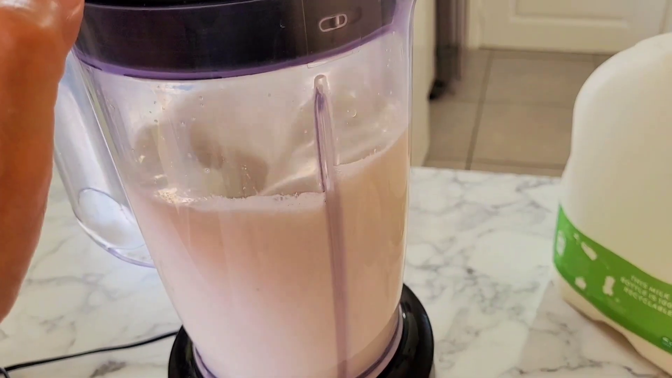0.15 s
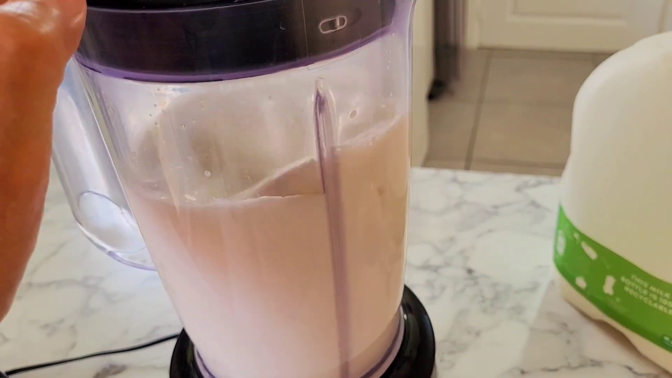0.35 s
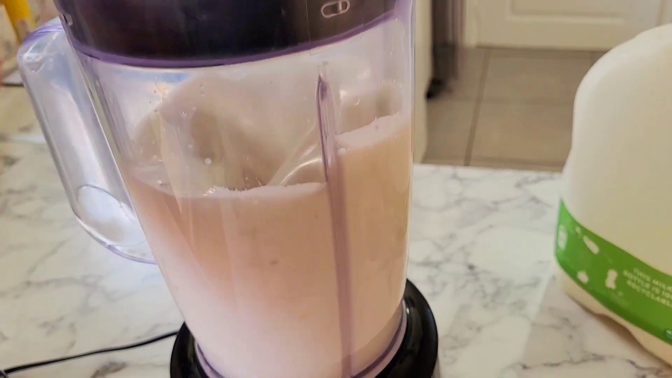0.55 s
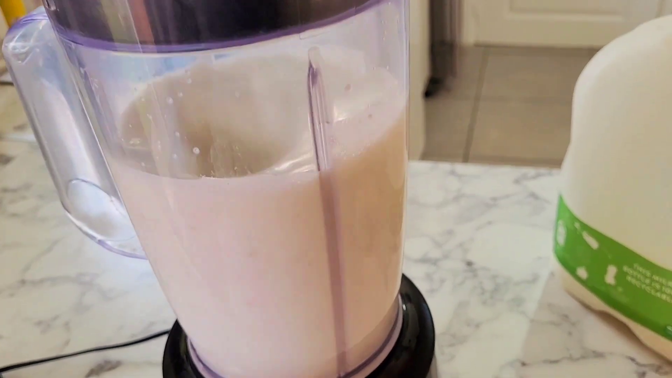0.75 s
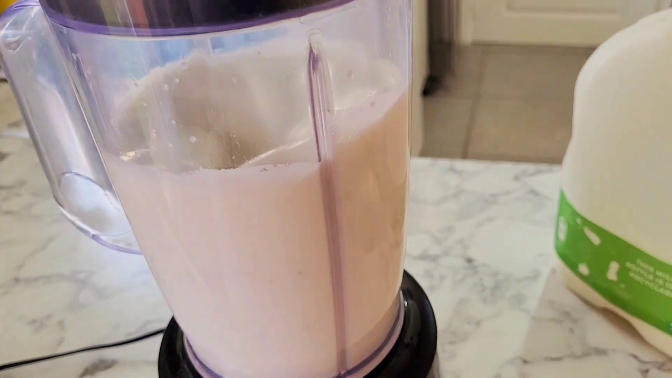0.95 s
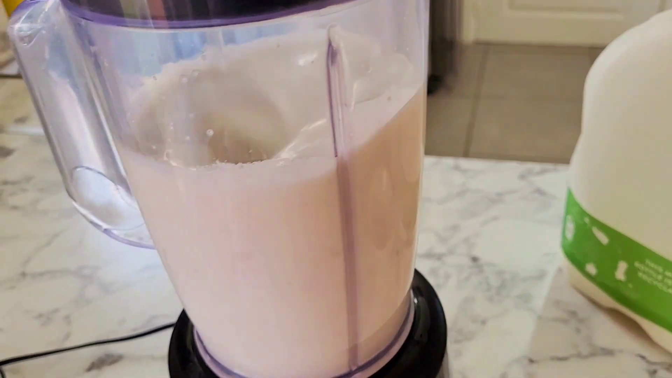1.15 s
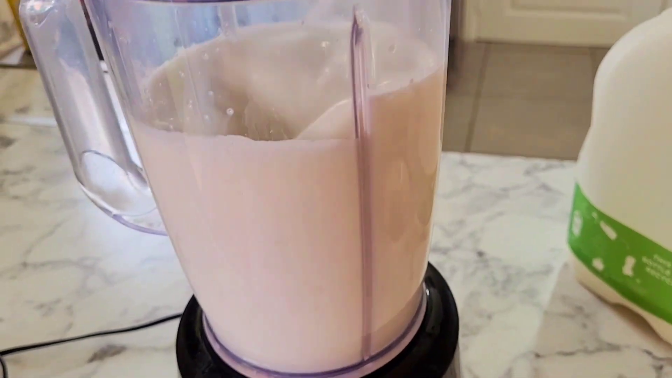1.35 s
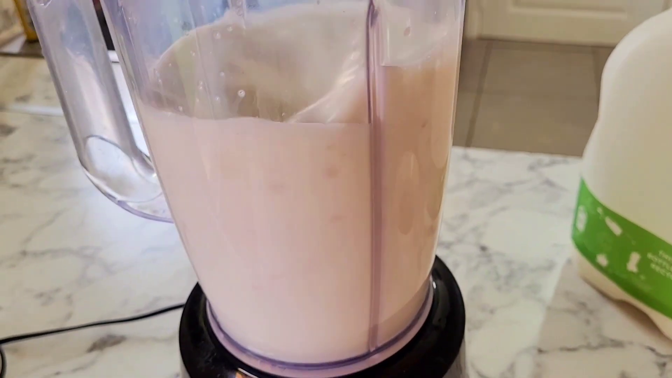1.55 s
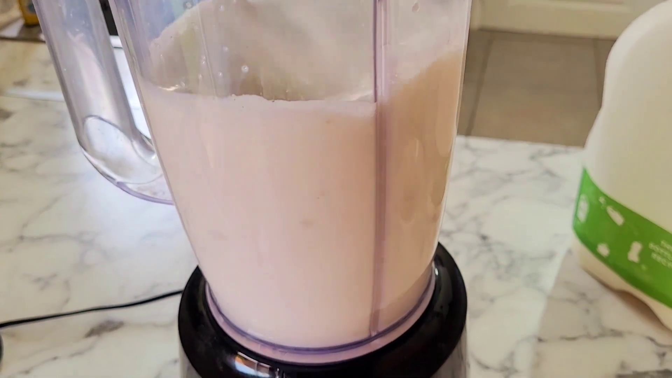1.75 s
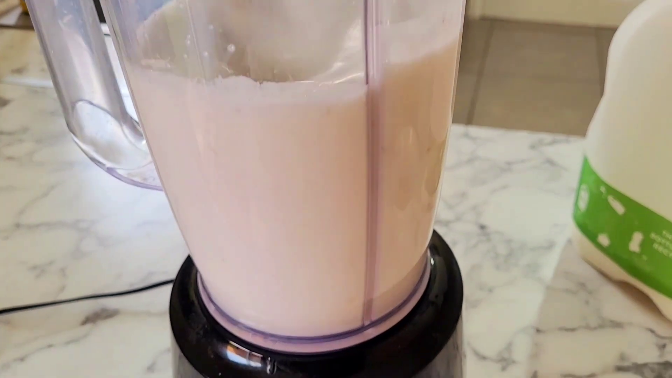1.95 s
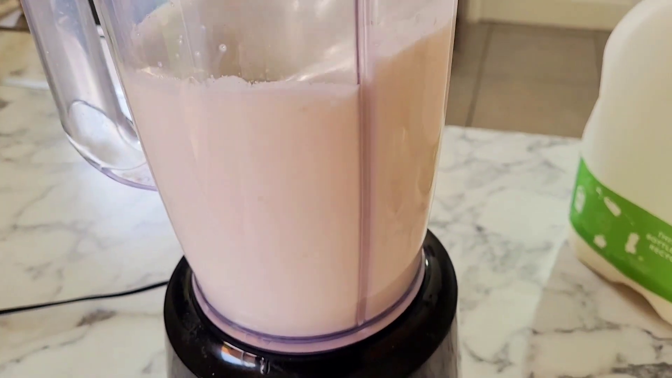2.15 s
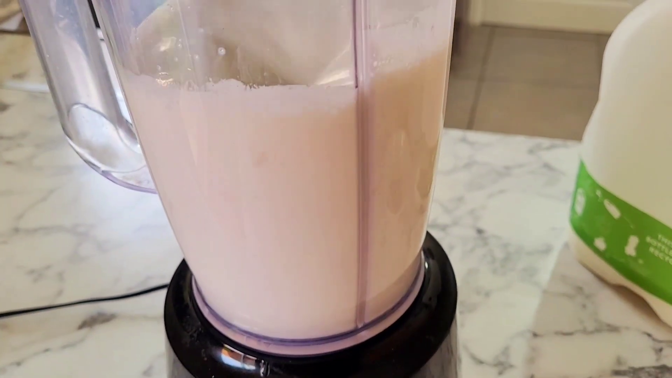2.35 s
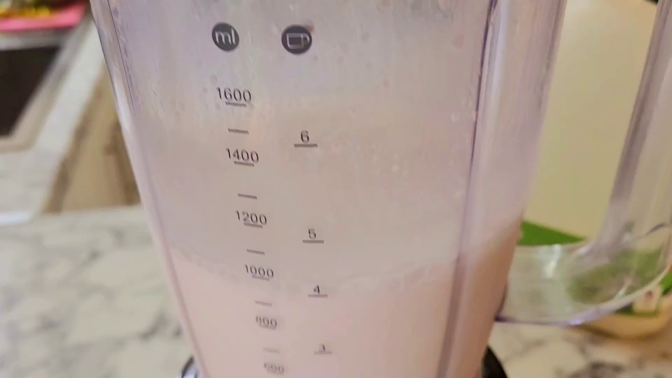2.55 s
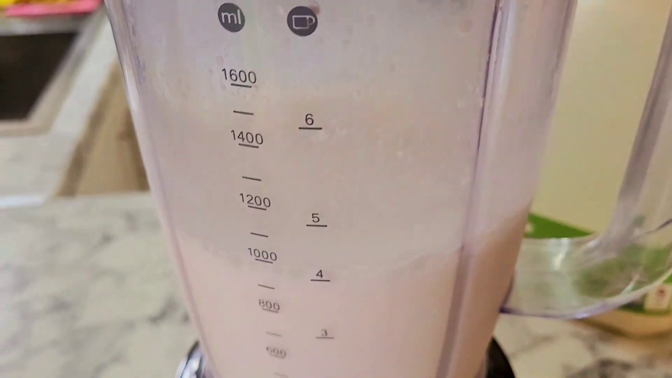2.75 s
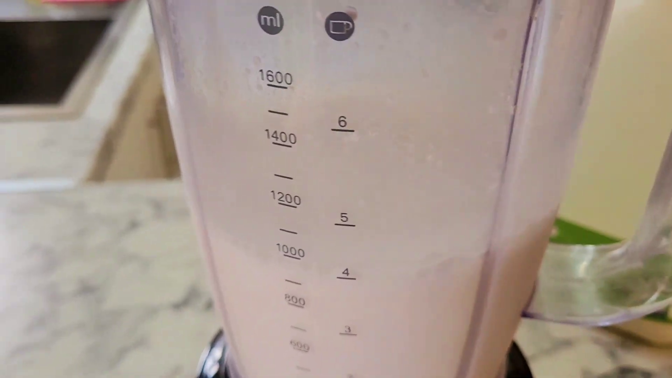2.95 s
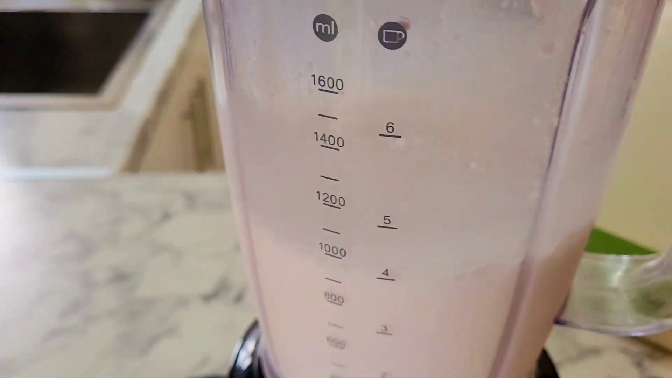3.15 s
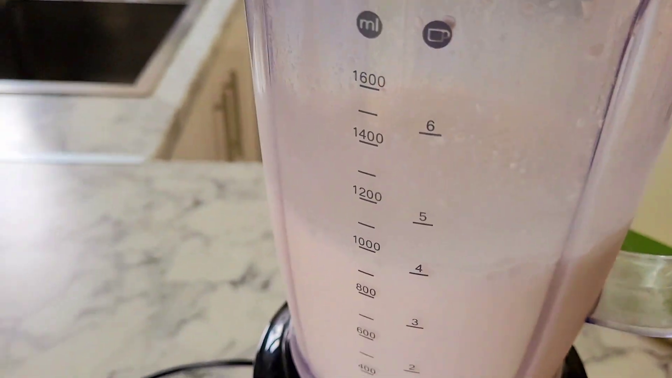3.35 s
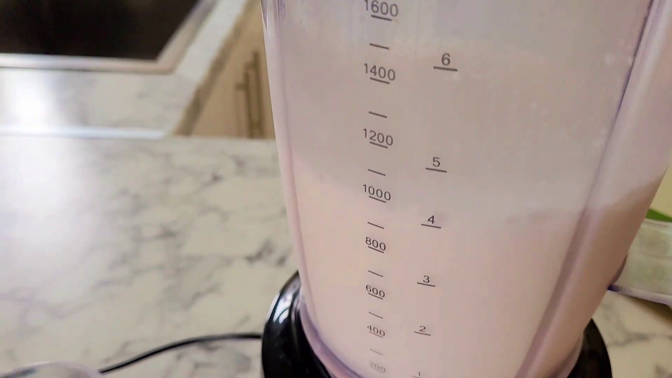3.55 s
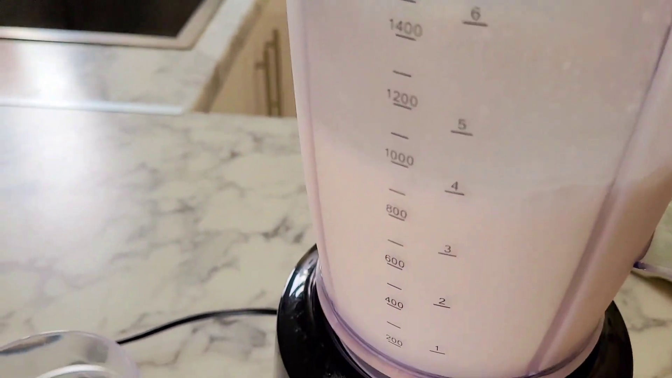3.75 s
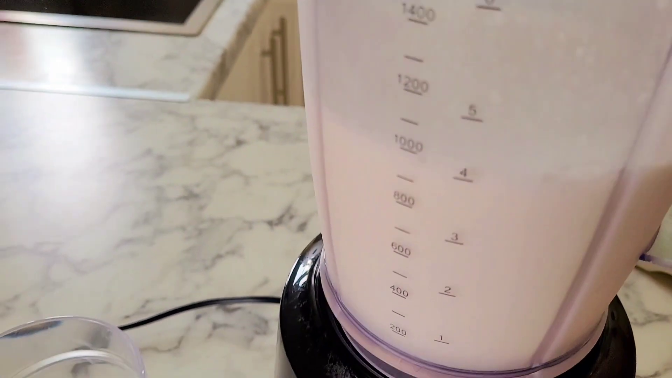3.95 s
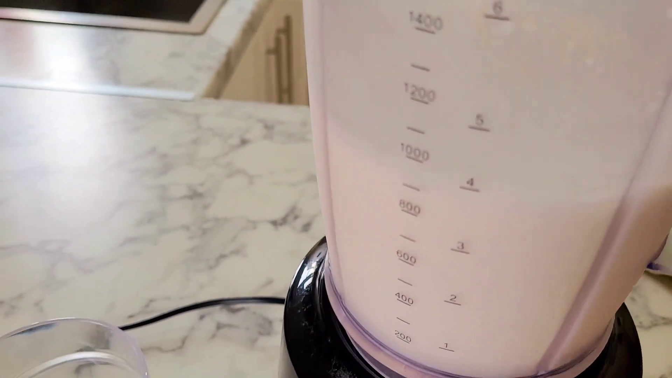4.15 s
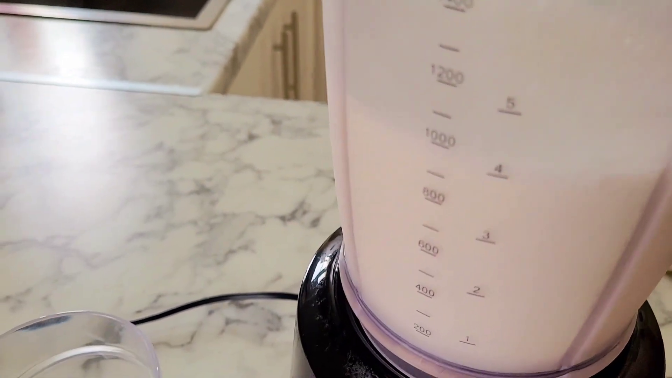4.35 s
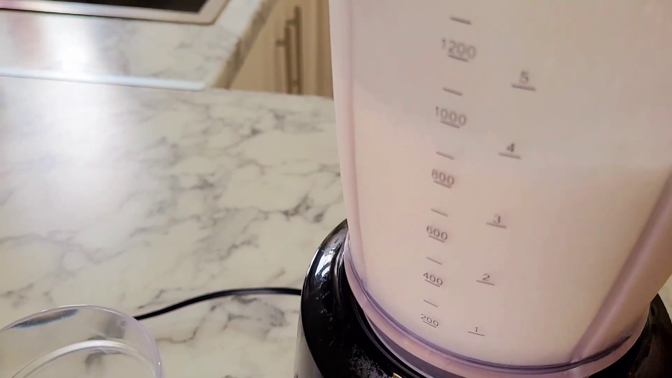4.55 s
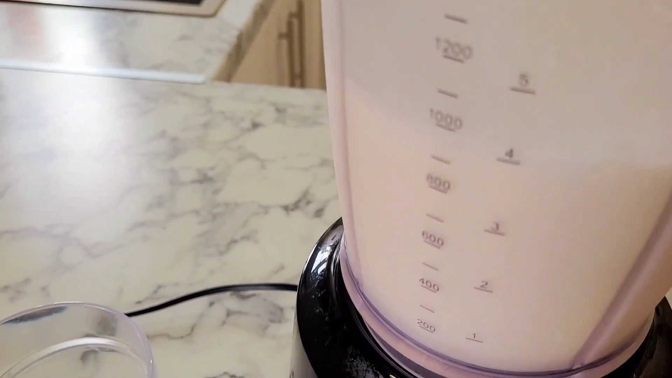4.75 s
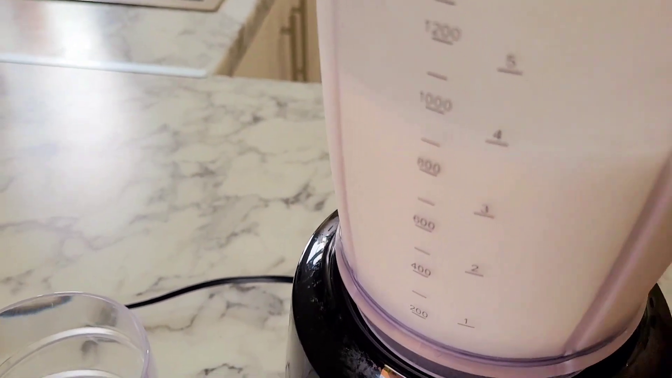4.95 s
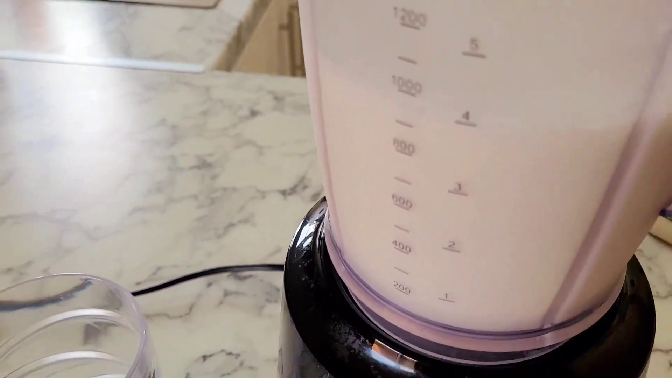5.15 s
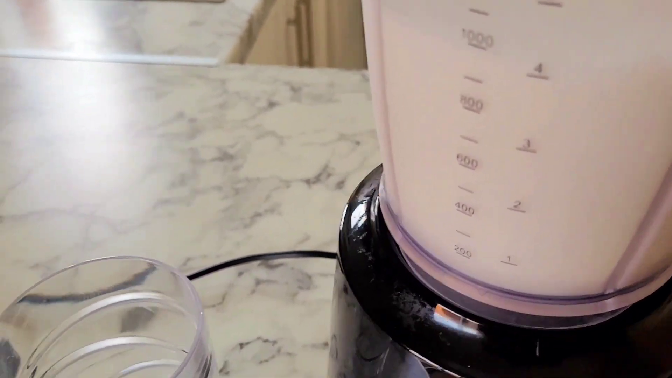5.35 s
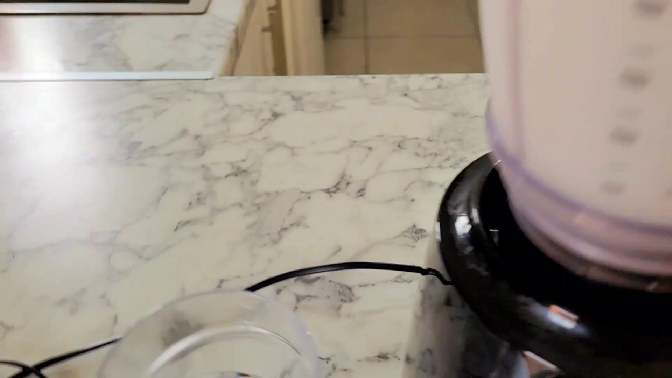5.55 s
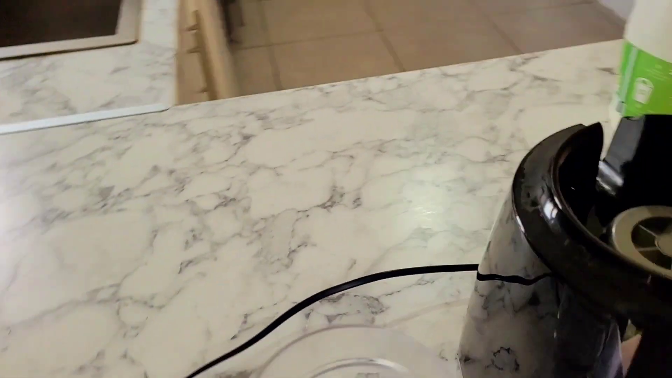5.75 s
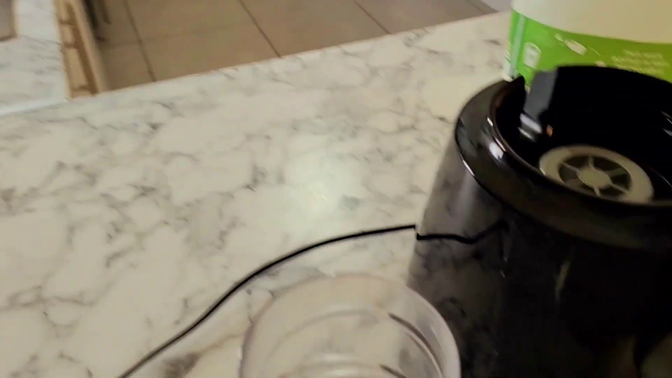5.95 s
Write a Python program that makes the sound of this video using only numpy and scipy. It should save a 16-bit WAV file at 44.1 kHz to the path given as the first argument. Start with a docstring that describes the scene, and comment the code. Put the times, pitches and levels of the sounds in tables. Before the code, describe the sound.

From 0 to about 2.6 seconds a countertop blender runs loudly and close: a steady motor buzz near 220 hertz with wavering overtones and faint whine, broad splashing roar of thick drink, ringing jug resonances and deep counter rumble swelling near 0.7 and 2.3 seconds. Brittle ice cracks flick through it, more often near the end. At 2.57 seconds everything stops at once. A quiet low kitchen background and very faint fridge hum remain. Around 3.1 to 3.4 seconds, hollow plastic knocks tap the base with tiny squeaks; a stronger clattering cluster comes at 3.8. At about 4.7 a hard object bangs farther away, a rapid triple blow with a long bright room echo. From 5.2 to 5.5 softer jug bumps, a low rubbing groan and brushing accompany the lifting, with gentle strokes near 5.7 and a brighter brush and faint tap around 6.1.

```python
"""A countertop blender churns a thick drink in a hard kitchen: motor tones, splashing noise, ringing jug
resonances, a rumbling counter and cracking ice, all cut off at once. In the quiet after it the plastic jug is
knocked on its base, among faint squeaks, breathy whistles, groans and a short ring; something hard bangs
further off and rings through the room as struck modes and a noise tail; the jug is lifted away with soft
strokes of brushing noise. Under the quiet lies a low wavering background, and faint fridge tones hum
throughout."""
import sys
import numpy as np
from scipy import signal
from scipy.io import wavfile

SR = 44100
rng = np.random.default_rng(int(sys.argv[2]) if len(sys.argv) > 2 else 0)


def wrap_up_sound(samples):
    """Save the sound to the file named by the first command line argument, as 16-bit audio."""
    columns = np.atleast_2d(samples).T
    # keep every value between -1 and 1, then stretch to whole-number steps
    tamed = np.clip(columns, -1, 1)
    steps = np.round(tamed * 32767).astype(np.int16)
    wavfile.write(sys.argv[1], SR, steps)


N = 268569
CUT_S = 2.5735   # the blender is silent from here on
RUN_SIZE = round(CUT_S * SR)
RUN_T = np.arange(RUN_SIZE) / SR   # seconds while the blender runs


def from_db(db):
    """Decibels to gain."""
    return 10 ** (np.asarray(db) / 20)


def rms_one(x):
    """Scales to unit rms."""
    return x / np.sqrt(np.mean(x ** 2) + 1e-20)


def high_pass(x, hz):
    """Gentle second-order bass cut."""
    return signal.sosfilt(signal.butter(2, hz, "high", fs=SR, output="sos"), x)


def in_time(rows):
    """Columns of a curve table at every sample."""
    s, *columns = np.transpose(rows)
    return [np.interp(np.arange(N) / SR, s, c) for c in columns]


def at_hz(points, hz):
    """Reads a spectrum on a log-frequency axis."""
    known_hz, values = np.transpose(points)
    return np.interp(np.log(hz), np.log(known_hz), values)


def drift(rate, size=N):
    """Smooth random wander of spread 1; a higher rate wanders faster."""
    r = np.exp(-80 * np.pi * rate / SR)   # computed at every 40th sample
    noise = rng.standard_normal(size // 40 + 2002)
    slow = signal.lfilter([1], [1, -2 * r, r * r], noise)[2000:]   # skip the filter's start
    return np.interp(np.arange(size) / 40, np.arange(len(slow)), rms_one(slow))


RISE_SHARE = 0.91   # a swell rises in this share of the time it takes to fall


def swells(rows, t):
    """Sum in dB of lifts that rise to their peak a little faster than they fall back."""
    return sum(db * np.exp(-np.abs(t - s) / np.where(t < s, RISE_SHARE * length, length))
               for s, db, length in rows)


def ring(clicks, hz, t60):
    """Two-pole resonance: a unit click sets a sine of height 1 ringing, down 60 dB after t60 seconds."""
    r, w = from_db(-60 / (t60 * SR)), 2 * np.pi * hz / SR
    return signal.lfilter([0, np.sin(w)], [1, -2 * r * np.cos(w), r * r], clicks + 1e-18)


def width_t60(width):
    """Decay time in seconds of a resonance of this width in Hz."""
    return np.log(1000) / np.pi / width


# How alike left and right are. Each row: frequency in Hz, likeness from -1 to 1.
LIKENESS = [(60, 0.54), (130, 0.66), (290, 0.98), (560, 0.38), (900, 0.27), (1400, -0.24), (3100, 0.12),
            (7000, -0.052), (15000, 0.78)]
EDGES = 28 * 2 ** np.arange(0, 9.4, 1 / 3)   # third-octave band edges in Hz


def stereo_noise(gain, size):
    """Third-octave bands of noise, each as alike left and right as LIKENESS asks; gain(hz) sets its level."""
    out, white = 0, rng.standard_normal((2, 2, size))
    for k, (low, high) in enumerate(zip(EDGES, EDGES[1:])):
        band_filter = signal.butter(3, [low, high], "band", fs=SR, output="sos")
        mid, side = signal.sosfilt(band_filter, white[k % 2])   # neighbouring bands use separate noise
        hz = np.sqrt(low * high)
        alike = np.clip(at_hz(LIKENESS, hz), -1, 1)
        out = out + gain(hz) * (np.sqrt(1 + alike) * mid + np.sqrt(1 - alike) * side * [[1], [-1]])
    return out


def burst(t60, size=2000):
    """A short crack of noise dying 60 dB in t60 seconds."""
    return rng.standard_normal(size) * from_db(-60 * np.arange(size) / SR / t60) / 2


def add(out, sound, s):
    """Mixes a sound in at a time in seconds."""
    i = round(s * SR)
    out[..., i:i + sound.shape[-1]] += sound[..., :N - i]


# How long the room rings, before each use scales it. Each row: frequency in Hz, t60 in seconds.
ROOM_T60 = [(60, 0.7), (160, 0.27), (420, 0.44), (1100, 0.53), (2910, 0.49), (7680, 0.39)]


def echoes(colour, t60_scale, size):
    """Room answer to a click: noise that builds over the first reflections and dies band by band."""
    t = np.arange(size) / SR
    tail = stereo_noise(lambda hz: from_db(at_hz(colour, hz) - 60 * t / (t60_scale * at_hz(ROOM_T60, hz))),
                        size)
    tail = high_pass(tail * (1 - np.exp(-t / .006)), 130)
    return tail / np.sqrt(np.mean(np.sum(tail ** 2, axis=1)))   # unit energy per channel on average


# Motor shaft, before a small jitter. Each row: time in seconds, speed in turns per second.
SPEED = [(0.0, 218.2), (0.23, 217.6), (0.4, 220.0), (0.79, 221.5), (1.02, 227.2), (1.27, 220.8),
         (1.47, 219.6), (1.78, 226.6), (2.15, 220.8), (2.56, 222.2)]


def blender():
    """The shaft turn drives motor tones and throbbing churn; rumble and ice join, and all end abruptly
    together."""
    speed = in_time(SPEED)[0][:RUN_SIZE]
    turn = 2 * np.pi * np.cumsum(speed * (1 + 0.004 * drift(25, RUN_SIZE))) / SR   # shaft angle, radians
    out = ice_cracks()
    out[:, :RUN_SIZE] += churn(turn) + motor(speed, turn) + counter_rumble()
    out[1] = np.roll(out[1], 4)   # the right port is a little further away
    return out * np.clip((RUN_SIZE - np.arange(N)) / (0.00084 * SR), 0, 1)   # the sound ends within a ms


# Motor tones, each loudest at the speed where the housing answers it. Each row: multiple of the shaft
# speed, level in dB, best speed in turns per second, loss in dB per turn per second off it, waver in dB.
MOTOR_TONES = [(1.0, -28.5, 226.2, .5, 1.5), (2.0, -29, 220.5, 1.5, 3), (4.0, -29.5, 225.5, 1.3, 2.8)]
# Brief swells of single motor tones. Each row: multiple, peak in seconds, lift in dB, length in seconds.
TONE_SWELLS = [(4.0, 0.26, 11, 0.066), (2.0, 0.27, 8, .05), (1.0, 0.91, 1.5, .06), (1.0, 1.14, 2, .1),
               (2.0, 1.19, 3.5, 0.11), (2.0, 2.6, 4, .08), (4.0, 2.28, 5.5, .1), (1.0, 2.44, 7, .07),
               (4.0, 2.45, 6, .05)]
# Faint higher motor tones, before their waver. Each row: multiple of the shaft speed, level in dB.
WHINE = [(6, -50), (7, -45.5), (8, -51.5), (12, -40), (13, -35.5), (17, -54.5)]
TONE_WAVER_RATE, WHINE_WAVER_RATE, WHINE_WAVER_DB = 9, 6.5, 2.6


def motor(speed, turn):
    """Sines locked to multiples of the shaft turn; the housing favours each strong one near its best speed."""
    out = 0
    side_turn = turn + 1.08 + np.array([[.1], [-.1]])   # left and right slightly out of phase
    for k, db, best, loss_db, waver_db in MOTOR_TONES:
        own_swells = [row[1:] for row in TONE_SWELLS if round(row[0]) == round(k)]
        level_db = db - loss_db * abs(speed - best) + swells(own_swells, RUN_T)
        level_db = level_db + waver_db * drift(TONE_WAVER_RATE, RUN_SIZE)
        out = out + np.sqrt(2) * from_db(level_db) * np.sin(round(k) * side_turn)
    for k, db in WHINE:
        level = from_db(db + WHINE_WAVER_DB * drift(WHINE_WAVER_RATE, RUN_SIZE))
        out = out + level * np.sin(round(k) * turn + rng.uniform(0, 2 * np.pi, (2, 1)))
    return out


# Churn and cooling air. Each row: frequency in Hz, relative density in dB per Hz.
ROAR = [(30, -39), (90, -33.5), (170, -39.5), (230, -4.5), (330, -3), (420, -14), (600, -11.5),
        (900, -10.5), (2000, -10.5), (3300, -9.5), (3900, -13.5), (5000, -16), (7200, -28), (8800, -34),
        (11500, -27.5), (16000, -34.5)]
# Stereo lean of the churn. Each row: frequency in Hz, left minus right in dB.
LEAN = [(60, -5), (110, -5.5), (200, 8), (380, -2.5), (700, -3), (1290, 0.0), (2380, 2), (4400, 1),
        (8120, -3.5), (15000, 8.5)]
# Drink folding back onto the blade. Each row: peak in seconds, lift in dB, length in seconds.
SURGES = [(0.01, 4, 0.083), (0.355, 2.5, 0.016), (0.468, 5.5, 0.037), (0.96, 0.5, .04), (1.09, 6, 0.017),
          (1.58, 1.5, 0.02), (1.8, 4, 0.05), (2.25, 3.5, 0.018)]
# Jug and housing resonances excited by the churn, before lift and waver.
# Each row: frequency in Hz, width in Hz, level in dB.
BODY = [(142, 57, -44), (291, 10, -38.5), (310, 46, -34.5), (351, 36, -36), (508.7, 19, -38.5),
        (950, 69, -32.5), (1206.7, 16, -34), (1356, 23, -35.5), (1550, 21, -39.5), (1680, 38, -35),
        (1776, 16, -41), (1877, 16, -38), (2520, 97, -38.5), (2585, 28, -35.5), (2914, 32, -40),
        (3206, 83, -33.5), (3388, 61, -38), (7530, 460, -40.5)]
SPLASH_DB, SPLASH_GROWS_DB_PER_S = -19.5, 0.68   # noise level, before the throb and the body resonances
SLOSH_WAVER_DB, SLOSH_RATE = 1.5, 12.3
RASP_DB, RASP_RATE = 1.05, 260   # quick uneven pulses of grit on the blade


def churn(turn):
    """Banded noise of drink and air, throbbing once a turn, with noise-driven resonances of jug and housing."""
    splash_db = swells(SURGES, RUN_T) + SPLASH_GROWS_DB_PER_S * (RUN_T - CUT_S / 2)
    slosh_db = SLOSH_WAVER_DB * drift(SLOSH_RATE, RUN_SIZE)
    rasp_db = RASP_DB * drift(RASP_RATE, RUN_SIZE)
    lumps_db = .6 * drift(33, RUN_SIZE)   # lumps passing the blade lift all bands together

    def band(hz):
        """Slosh takes over from splash below about 500 Hz."""
        low = 1 / (1 + (hz / 500) ** 4)
        lean_db = at_hz(LEAN, hz) / 2 * np.array([[1], [-1]])
        motion_db = low * slosh_db + (1 - low) * (splash_db / (1 + hz / 7000) + rasp_db)
        own_db = 0.99 * drift(21, RUN_SIZE)   # each band also wavers alone
        return from_db(at_hz(ROAR, hz) + motion_db + lean_db + lumps_db + own_db)

    noise = high_pass(stereo_noise(band, RUN_SIZE), 150)
    noise = noise / np.sqrt(np.mean((noise / from_db(splash_db)) ** 2))   # level with the splash lifts undone
    out = from_db(SPLASH_DB) * noise * (1 + 0.14 * np.sin(turn))
    for hz, width, db in BODY:
        shared, own = rng.standard_normal(RUN_SIZE), rng.standard_normal((2, RUN_SIZE))
        alike = np.clip(at_hz(LIKENESS, hz), 0, 1)
        rung = ring(np.sqrt(alike) * shared + np.sqrt(1 - alike) * own, hz, width_t60(width))
        level_db = db + (hz > 500) * splash_db + 2.0 * drift(5, RUN_SIZE)
        out = out + from_db(level_db) * rms_one(rung)
    return high_pass(out, 120)


# The counter shakes harder. Each row: peak in seconds, lift in dB, length in seconds.
SHUDDERS = [(0.72, 6, 0.287), (2.29, 11, 0.32)]
RUMBLE_DB, RUMBLE_WAVER_DB = -57, 6   # level between shudders, before the waver


def counter_rumble():
    """The shaking counter: noise driving a 49 Hz resonance, wavering and swelling in shudders."""
    push = rng.standard_normal(RUN_SIZE) + .3 * rng.standard_normal((2, RUN_SIZE))
    level_db = RUMBLE_DB + swells(SHUDDERS, RUN_T) + RUMBLE_WAVER_DB * drift(4, RUN_SIZE)
    return from_db(level_db) * rms_one(ring(push, 49, .15))


# Ice bits under the blade. Each row: time in seconds, level in dB of a burst before its bass cut.
CRACKS = [(0.0244, -18), (0.249, -11.5), (0.4694, -28), (0.6486, -18), (1.0829, -16.5), (1.2774, -15.5),
          (1.3289, -19), (1.6357, -18), (1.7906, -30), (1.9234, -14), (2, -16), (2.111, -15), (2.1724, -15),
          (2.2827, -12.5)]


def ice_cracks():
    """Brittle ice breaking: short bursts of treble noise that die at a different pace on each side."""
    out = np.zeros((2, N))
    for s, db in CRACKS:
        add(out, from_db(db) * high_pass([burst(0.016), burst(0.029)], 2500), s)
    return out


# Jug knocks. Each row: start in seconds, tick level in dB, tick colour in Hz, snap level in dB,
# thump peak in dB, thump colour in Hz, left minus right in dB (levels before this pan).
KNOCKS = [(3.104, -50, 1700, -49, -55, 357, 0.5), (3.116, -32, 1740, -48, -31, 240, 3),
          (3.129, -43, 1890, -52, -34, 352, 1.5), (3.3, -39.5, 1330, -54, -32, 190, 4),
          (3.312, -35.5, 1117, -44, -26, 233, 3), (3.36, -38.5, 1070, -65, -44, 234, -2),
          (3.548, -56, 749, -66, -46, 231, -2.5), (3.641, -51, 1100, -46.5, -64, 320, 2.5),
          (3.777, -45, 3240, -37, -37, 250, 2), (3.793, -42, 1850, -39, -37, 215, 5),
          (3.806, -36, 1090, -27, -24.5, 283, 4), (3.836, -30, 1920, -27, -26.5, 263, -2),
          (3.883, -56, 1120, -39, -36.5, 272, 0.1), (4.308, -61, 929, -59, -47.5, 310, -1),
          (5.22, -38.5, 1600, -55, -62, 194, 0.5), (5.331, -49, 910, -55, -31.5, 283, -4),
          (5.37, -51, 1210, -58, -42, 291, -6), (5.39, -53, 1500, -55, -40, 276, -4),
          (5.441, -44, 2930, -59, -39, 218, 0), (5.464, -61, 895, -52, -49, 226, 0.1),
          (6.066, -57, 1030, -50, -38, 324, -4)]
# Jug low modes. Each row: frequency in Hz, relative level in dB, t60 in seconds.
JUG = [(136, 0, 0.134), (162, 0, 0.065), (215, -0.5, 0.051), (238, -2, 0.066), (283, 1, 0.047),
       (356, -8.5, 0.07), (478, -4, 0.048)]
# Jug wall modes. Each row: frequency in Hz, relative level in dB, t60 in seconds.
WALL = [(1065, -3.5, 0.05), (1690, -4, 0.092), (1970, -1, 0.085), (3140, -14, 0.086), (3700, -17, .1),
        (4870, -8, .05)]
AIRY_DB, WALL_DB = -18, -15   # hiss relative to the snap; wall share of the tick
THUMP_LAG_S = .001   # the low push builds just after the tick
KNOCK_ROOM_DB = 1   # send to the room, before the share of each part


def knocks():
    """Each knock is a snap, a tick that rings the jug wall near its colour and a soft push into the low modes."""
    size = 8000
    dry, send = np.zeros((2, N)), np.zeros(N)
    sharp = signal.butter(2, [2500, 7000], "band", fs=SR, output="sos")
    push = np.zeros(size)
    push[:120] = np.diff(np.hanning(121))   # press and release
    for s, tick_db, tick_hz, snap_db, thump_db, thump_hz, pan_db in KNOCKS:
        hiss = high_pass([burst(0.2, size) for side in "LR"], 7000)
        snap = from_db(snap_db) * (signal.sosfilt(sharp, burst(0.032, size)) + from_db(AIRY_DB) * hiss)
        touch = burst(0.0064, size)
        tick = ring(touch, tick_hz, 4.4 / tick_hz)
        # modes near the colour of the blow ring most: loss in dB per octave away
        wall = sum(from_db(db - 25.0 * abs(np.log2(hz / tick_hz))) * ring(touch, hz, t60)
                   for hz, db, t60 in WALL)
        thump = sum(from_db(db - 14.0 * abs(np.log2(hz / thump_hz))) * ring(push, hz, t60)
                    for hz, db, t60 in JUG)
        bright = from_db(tick_db) * (tick + from_db(WALL_DB) * wall) / np.abs(tick).max()
        low = np.roll(from_db(thump_db) * thump / np.abs(thump).max(), round(THUMP_LAG_S * SR))
        add(dry, (snap + bright + low) * from_db([[pan_db / 2], [-pan_db / 2]]), s)
        add(send, from_db(KNOCK_ROOM_DB) * (.5 * snap[0] + 0.61 * bright + 0.96 * low), s)
    room_colour = [(60, -0.5), (1500, 2.5), (5000, 7.0), (16000, -2.0)]   # Hz, relative dB per Hz
    room = echoes(room_colour, 0.66, size=22050)
    return dry + signal.fftconvolve(send[None], room, axes=1)[:, :N]


# A far hard object struck. Each row: start in seconds, level in dB, lift of the low modes in dB,
# lift of the snap in dB, echo level in dB.
BANGS = [(4.6635, -12, -27, -0.5, 14.5), (4.6795, -16.5, 5.5, 6.5, 8), (4.688, -28, 8, -5.5, -2)]
# Modes of the struck object. Each row: frequency in Hz, relative level in dB, t60 in seconds.
BANG_MODES = [(232, -8.5, 0.13), (470.1, -4.5, 0.14), (710, -7, 0.028), (948, 0.5, 0.027),
              (1242, -8, 0.037), (1600, -19, 0.1), (2096, -12.5, .03), (2878, -2.5, .025),
              (3240, -6, 0.019), (3950, -4.5, 0.0204)]
# Colour of its echo. Each row: frequency in Hz, relative density in dB per Hz.
BANG_COLOUR = [(40, -43.5), (100, -11.5), (145, -8), (237, -2.5), (330, -5.5), (450, -7), (770, -15.5),
               (1200, -10), (1750, -4.5), (2320, -9.5), (3740, -12), (7000, -28), (16000, -51)]
# Resonances that colour the echo. Each row: frequency in Hz, width in Hz, level in dB.
ECHO_PEAKS = [(239, 15, 3.5), (458, 42, 0.5), (1640, 40, -2.5), (1776, 58, 0), (1890, 44, 1)]


def bang():
    """Three quick blows on one body: snap, ringing modes and a long coloured room tail."""
    size = 12000
    out, click = np.zeros((2, N)), np.zeros(size)
    click[:8] = np.hanning(8) / 3   # a contact of a fifth of a ms
    for k, (s, level_db, low_db, snap_db, echo_db) in enumerate(BANGS):
        tail = echoes(BANG_COLOUR, 1.123, size=30000)
        tail = tail + sum(from_db(db) * ring(tail, hz, width_t60(width)) * 2 * np.pi * width / SR
                          for hz, width, db in ECHO_PEAKS)
        modes = 0
        for hz, db, t60 in BANG_MODES:
            chance_db = 4.4 * rng.standard_normal((2, 1))   # each blow excites each mode differently
            modes = modes + from_db(db + low_db * (hz < 500) + chance_db) * ring(click, hz, t60)
        crack = [burst(0.0137, size), burst(0.013, size)]
        snap = from_db(snap_db) * signal.lfilter([.4], [1, -.3], crack)   # slightly dulled
        add(out, (-1) ** k * from_db(level_db) * (modes + snap), s)   # polarity alternates
        add(out, from_db(echo_db) * tail, s)
    return high_pass(out, 130)


# Colour of the brushing. Each row: frequency in Hz, relative density in dB per Hz.
BRUSH_COLOUR = [(290, -35), (500, -18), (570, -3), (698, -10), (855, -5), (960, -12), (1280, -3.5),
                (16000, -22)]
# Brushing strokes. Each row: start in seconds, level in dB, attack in seconds, hold in seconds,
# fade in dB per second, treble lift in dB.
STROKES = [(5.206, -56.5, 0.0091, .03, 57, -27), (5.435, -64, .006, .005, 162, -6),
           (5.712, -58.5, 0.067, 0.064, 75, -7), (6.064, -53, .006, .05, 71, 27)]


def brushing():
    """Hand and jug sliding: strokes of soft noise, each with attack, hold, fade and its own treble."""
    out, t = np.zeros((2, N)), np.arange(SR // 2) / SR

    def treble_share(hz):
        """Treble lift acts between about 5 and 15 kHz."""
        return 1 / (1 + (5000 / hz) ** 4) / (1 + (hz / 15000) ** 4)

    for s, db, attack, hold, fade_db, treble_db in STROKES:
        noise = stereo_noise(lambda hz: from_db(at_hz(BRUSH_COLOUR, hz) + treble_share(hz) * treble_db),
                             len(t))
        shape = np.minimum(t / attack, 1) * from_db(db - fade_db * np.maximum(t - attack - hold, 0))
        ending = np.minimum((t[-1] - t) / 0.075, 1)
        add(out, shape * ending * rms_one(noise), s)
    return out


# Faint squeaks, breathy whistles, groans and a short ring as narrow noise. Each row: start in seconds, # end in
# seconds, frequency in Hz, width in Hz, level in dB before the soft ends.
NARROW_NOISES = [(3.087, 3.30, 1730, 251, -68), (3.412, 3.47, 3950, 118, -74), (3.62, 3.78, 2520, 160, -68.5),
                 (3.638, 3.78, 4900, 400, -68.5), (4.249, 4.33, 2550, 199.8, -78), (4.27, 4.33, 3800, 400, -76),
                 (4.41, 4.502, 1400, 250, -71), (3.839, 3.941, 1920, 150, -68), (3.836, 3.903, 3360, 350, -54),
                 (5.328, 5.429, 278, 90, -50), (5.44, 5.485, 230, 90, -51)]


def narrow_noises():
    """Faint squeaks, breathy whistles, low groans and a short ring: noise held in a narrow resonance."""
    out = np.zeros((2, N))
    for start, end, hz, width, db in NARROW_NOISES:
        size = round((end - start) * SR)
        rub = ring(rng.standard_normal((2, size)), hz, width_t60(width))
        add(out, from_db(db) * rms_one(rub) * np.hanning(size) ** 0.13, start)
    return out


# Colour of the kitchen background. Each row: frequency in Hz, relative density in dB per Hz.
HUSH = [(18, -44), (30, -17), (55, -11.5), (70, -26.5), (145, -10), (161, -22.5), (233, -3), (355, -5.5),
        (600, -17.5), (666, -12.5), (844, -24), (1430, -29.5), (2170, -39.5), (5170, -33.5), (16000, -44.5)]
# Background over time. Each row: time in seconds, level in dB, treble lift in dB.
HUSH_LEVEL = [(2.6, -56.5, 0), (2.83, -59, -3), (3.75, -54, -6.5), (4.14, -60.5, 5.5), (4.5, -58.5, 3.5),
              (5.17, -60, 2), (5.32, -55.5, 0.5), (5.5, -63.5, 1.5), (5.7, -60.5, 3), (6.09, -57.5, 3)]


def hush():
    """Low kitchen background of noise bands, each wavering alone, whose faint treble comes and goes."""
    start = RUN_SIZE - 200   # just before the blender sound ends
    out = np.zeros((2, N))
    level_db, treble_db = [c[start:] for c in in_time(HUSH_LEVEL)]

    def band(hz):
        """Treble lift acts above about 1500 Hz."""
        lift_db = treble_db / (1 + (1500 / hz) ** 4)
        return from_db(at_hz(HUSH, hz) + 2.0 * drift(3.4, N - start) + lift_db)

    noise = stereo_noise(band, N - start)
    out[:, start:] = from_db(level_db) * rms_one(noise) * from_db([[-.6], [.6]])   # leans right
    return out


# A fridge somewhere, before the waver. Each row: frequency in Hz, level in dB.
FRIDGE_TONES = [(48.4, -73.5), (91.5, -81.5), (140.0, -75.5), (231.5, -78.5), (414.5, -79), (651.4, -77.5),
                (791.3, -85.5)]


def fridge():
    """Faint sines of fixed pitch that waver a little in level."""
    t = np.arange(N) / SR
    return sum(np.sqrt(2) * from_db(db + 1.6 * drift(2)) * np.sin(2 * np.pi * hz * t)
               for hz, db in FRIDGE_TONES)


def scene():
    """All sources."""
    return blender() + knocks() + bang() + brushing() + narrow_noises() + hush() + fridge()


def record(dry):
    """The microphone loses the deepest bass; the top is cut steeply at 16150 Hz."""
    thin = high_pass(dry, 45)
    return signal.sosfilt(signal.cheby2(14, 60, 16150, fs=SR, output="sos"), thin)


dry = scene()
out = record(dry)
wrap_up_sound(out)
```